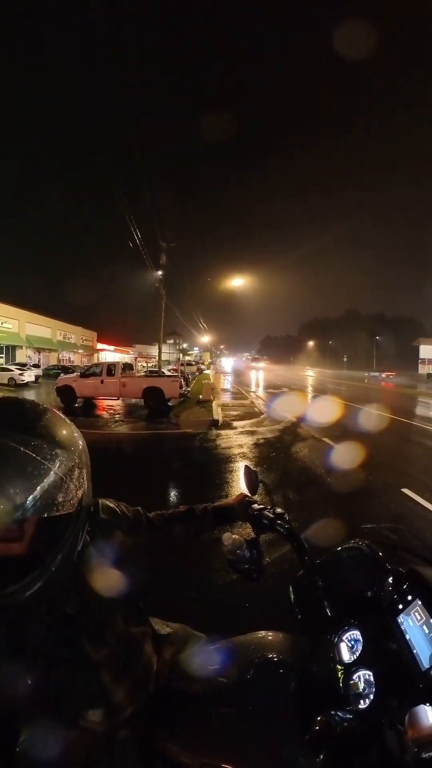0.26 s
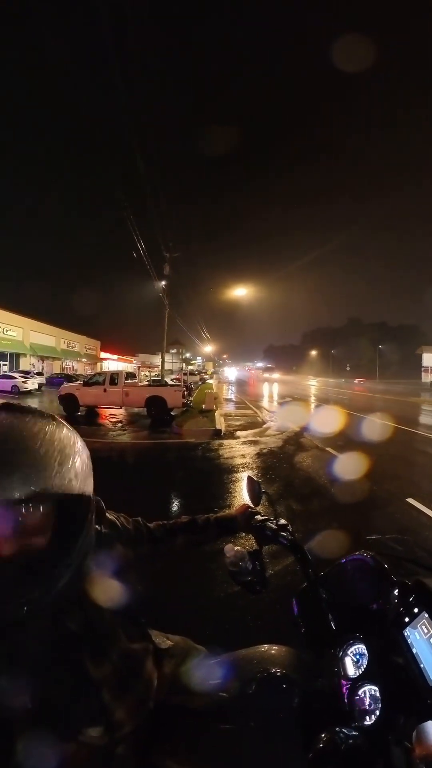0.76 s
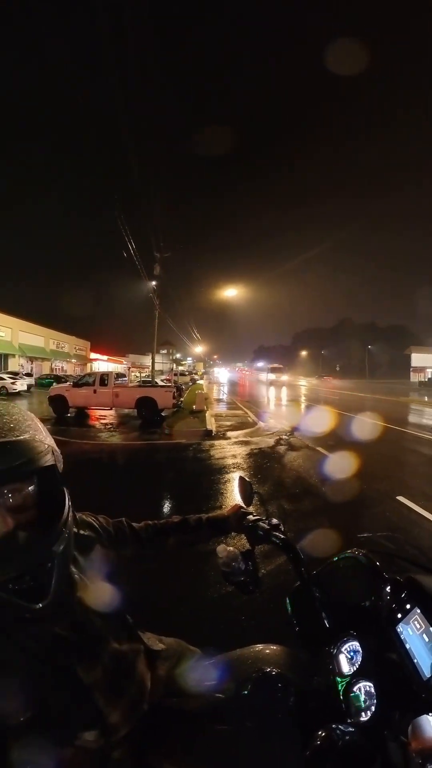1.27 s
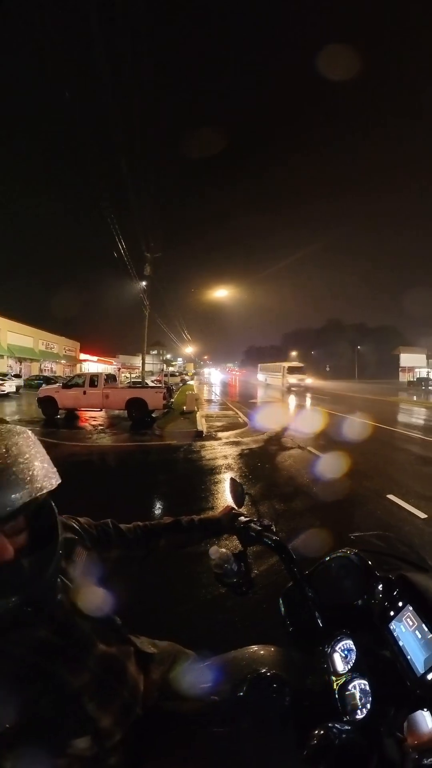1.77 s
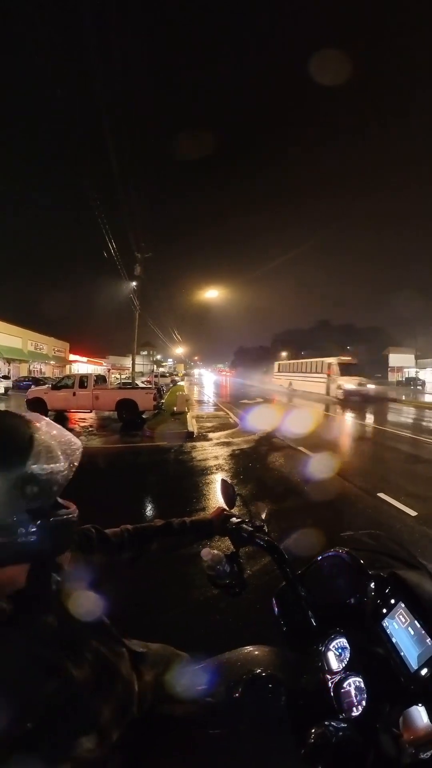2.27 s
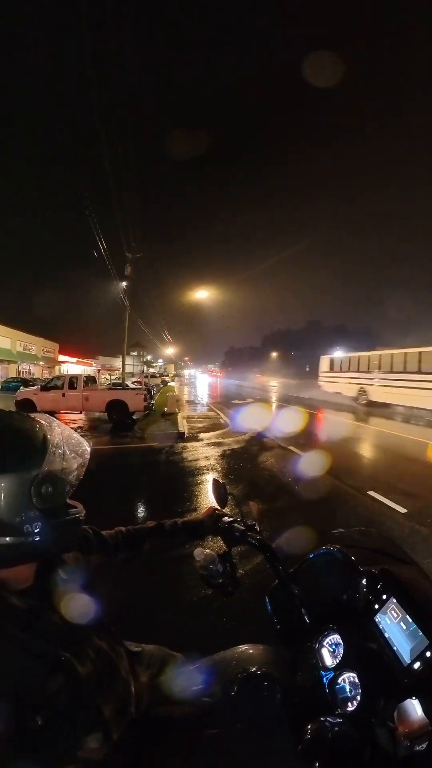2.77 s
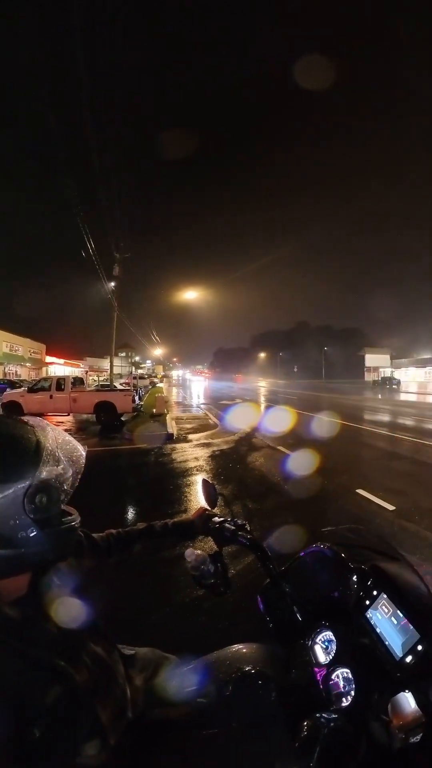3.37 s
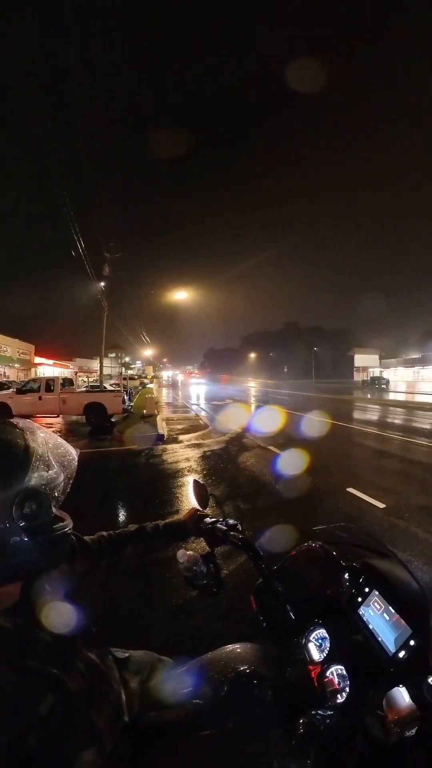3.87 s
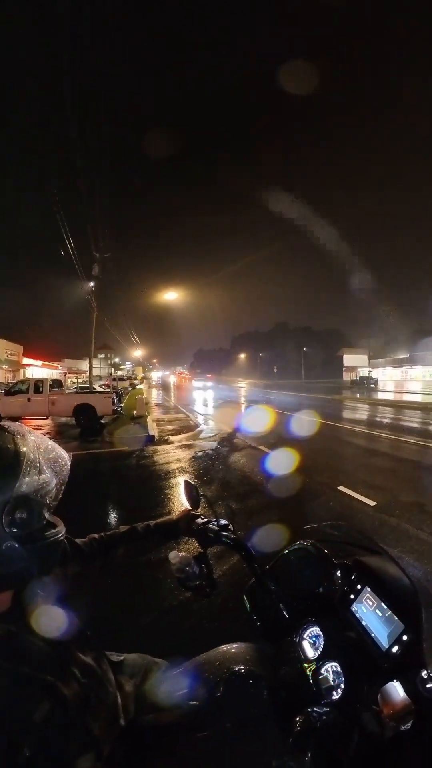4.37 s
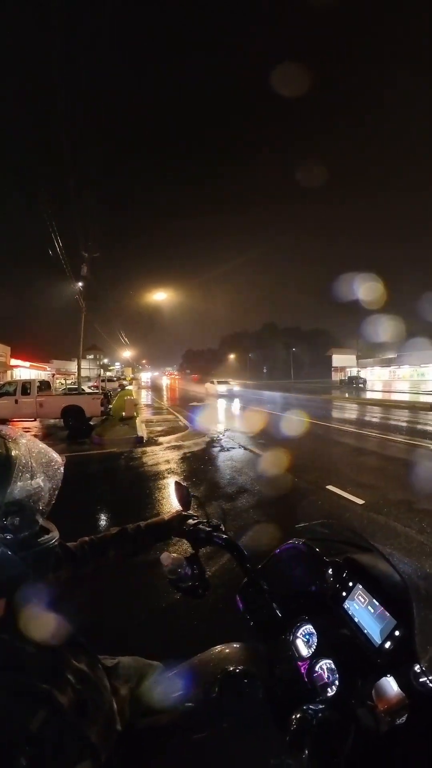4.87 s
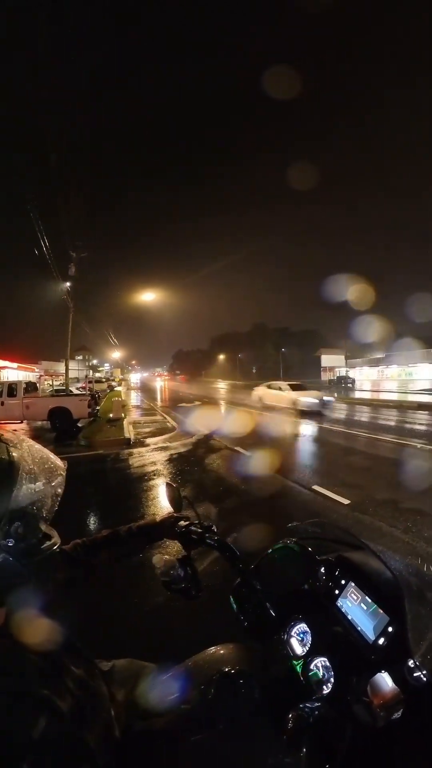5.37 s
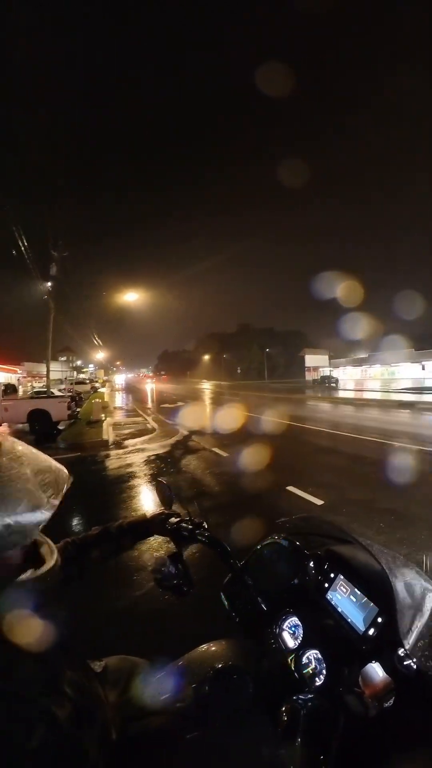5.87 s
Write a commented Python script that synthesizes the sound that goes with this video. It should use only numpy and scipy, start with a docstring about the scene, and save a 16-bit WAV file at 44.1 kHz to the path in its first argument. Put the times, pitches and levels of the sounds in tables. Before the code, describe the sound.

Two V-twin motorcycles idle with a lumpy throb and light metallic knocking beside a wet road, one right at the microphone. A bus passes, its tyres hissing and splashing through water, while a few raindrops tick close by. About halfway through, the near bike pulls away, its engine rising to a drone, dipping, then revving higher. The other keeps idling more quietly, and a car swishes by near the end.

```python
"""The lumpy idle of two V-twin motorcycles is heard first, beside a wet road at night. The near one pulls
away, revving in two swells, while its neighbour keeps idling. Each firing sends a pressure pulse
that rings the exhaust's resonances; at speed the pulses merge into a harmonic drone. A bus and two cars
pass, their tyres breaking the water film into hissing spray, and light rain ticks close by."""
import sys
import numpy as np
from scipy import signal
from scipy.fft import rfft, irfft, next_fast_len
from scipy.io import wavfile
from scipy.ndimage import map_coordinates

SR = 44100
rng = np.random.default_rng(int(sys.argv[2]) if len(sys.argv) > 2 else 0)


def wav_out(sig):
    """Save sig, one row per channel (or a flat mono array), as 16-bit PCM at SR to the path in sys.argv[1]."""
    wavfile.write(sys.argv[1], SR, np.round(np.clip(np.atleast_2d(sig).T, -1, 1) * 32767).astype(np.int16))


N = 270333
TIME = np.arange(N) / SR

# Speed of the near engine. Each row: time in seconds, four-stroke cycles per second.
SPEED = [(0, 11.41), (.75, 10.82), (1.35, 11.14), (2.1, 10.87), (2.45, 11.25), (2.83, 10.9), (3.2, 17.73),
         (3.4, 20.5), (3.87, 20.54), (4.4, 15.81), (4.77, 16.96), (5.14, 17.19), (5.29, 24.46),
         (5.58, 23.11), (5.8, 23.87), (5.9, 20.41), (6.13, 17.79)]
# How bright and hissy the near engine sounds: steady at idle, swelling and ebbing as it revs.
# Each row: time in seconds, brightness from 0 to 1.
ENGINE_BRIGHTNESS = [(2.85, 0.76), (3.1, 0.87), (3.3, 0.82), (3.9, 0.8), (4.11, 1), (4.38, 0.84),
                     (4.55, 0.88), (5.1, 0.87), (5.25, 0.95), (5.34, 0.52), (5.41, 0.81), (5.79, 0.83),
                     (5.85, 0.63)]
# Load from the slipping clutch. Each row: time in seconds, load from 0 to 1.
LOAD = [(3.18, 1), (3.42, 0), (3.9, 0.02), (4.3, 0.95), (5.15, 0.94), (5.33, 0)]
# Resonant modes. Each row: frequency in Hz, bandwidth in Hz, relative gain in dB.
EXHAUST_MODES = [(54.8, 9.5, -9), (69.4, 2.5, 0), (87.2, 5.6, -6.5), (110, 7.8, -3), (118.6, 24.7, -6.5),
                 (132, 6, -9.5), (163.4, 2.8, 0), (182.8, 6.1, 0.5), (212, 6.2, -27.5), (231, 9, -11),
                 (286, 5.4, -19), (353, 5.5, -17), (343, 36, -12)]   # near pipes and mufflers
THUMP_MODES = [(119.3, 22, -5.5)]   # the strong cylinder in the muffler at idle
BARK_MODES = [(150, 120, 41)]   # the pipe during a hard spin-up
BOOM_MODES = [(66, 36, 33), (175, 70, 37)]   # the open pipe as the engine shudders
CASING_MODES = [(924, 13, -1.5), (1189, 10, 0.5), (1473, 22, -17.5)]   # crankcase and covers
NEIGHBOUR_MODES = [(51.1, 11.5, -1), (78, 7.4, -18), (109.7, 19, -18.5), (133.8, 26, -1), (162, 22, -19),
                   (226, 67, -12), (265, 15, -26.5), (360, 21, -23.5)]
METAL_MODES = [(688, 34, 1.5), (738, 36, 5.5), (920, 110, -19), (1130, 110, -21)]   # the neighbour's ringing metal
# Exhaust harmonics. Each row: multiple of the cycle rate, relative dB running free, the same under load.
HARMONICS = [(2, -25, -56), (3, -27, -26.5), (4, -27.5, -18.5), (5, -19, -21), (6, -31, -26), (7, -23, -22),
             (8, -26.5, -46), (9, -22.5, -22.5), (10, -27, -25.5), (11, -43.5, -33.5), (12, -26.5, -38.5),
             (13, -35, -29), (14, -34, -24.5), (15, -49, -31), (16, -33.5, -72), (17, -46, -42),
             (18, -40.5, -30.5)]
# Muffler response. Each row: frequency in Hz, gain in dB.
MUFFLER_RESPONSE = [(60, -6.5), (118, 1.5), (146, 2.5), (166, -2.5), (186, -2), (212, -9), (380, -5.5),
                    (430, -23)]
# Reflections of the neighbour's exhaust. Each row: delay in seconds, gain in dB.
REFLECTIONS = [(.009, -5.5), (.019, 0.5), (.036, -4)]
# The neighbour's hardest knocks. Each row: time in seconds, relative strength in dB.
KNOCKS = [(.17, -31), (.353, -28.5), (.726, -28.5), (.945, -30), (1, -30), (1.594, -28.5), (1.835, -30.5),
          (1.967, -31), (2.02, -31.5), (2.151, -31), (2.202, -30), (2.483, -31), (2.571, -30.5),
          (2.756, -31), (4.238, -27), (4.323, -32), (4.951, -31)]
# Noise spectra of the near engine. Each row: frequency in Hz, relative spectral density in dB.
MACHINERY_SPECTRUM = [(300, 7), (420, -2), (500, -3.5), (720, -1.5), (850, -7), (1050, -9), (1200, -10.5),
                      (1430, -13.5), (1520, -20), (2400, -21.5), (4000, -38.5)]
INTAKE_SPECTRUM = [(4200, -11), (5000, -3), (6500, -5), (8000, 2), (9200, -4), (10500, -9), (12000, -13.5),
                   (15000, -25)]
TAILPIPE_SPECTRUM = [(260, 8), (380, -4.5), (500, -13)]
# Noise spectra of wet tyres. Each row: frequency in Hz, relative spectral density in dB.
ROAR_SPECTRUM = [(300, -6), (480, 11.5), (900, 12), (1600, 4), (1900, 5.5), (2300, 2), (2700, 1),
                 (3300, -8), (5000, -27)]
SPLASH_SPECTRUM = [(2400, -24), (3000, 8), (3350, 5.5), (3700, 8), (4100, 6.5), (4250, 6), (4800, 2),
                   (5600, -39)]
SPRAY_SPECTRUM = [(4200, -8), (5000, 4), (6000, 4.5), (6500, 3), (7400, 2.5), (8300, -6.5), (9500, -18),
                  (12000, -22)]
MIST_SPECTRUM = [(6000, 2), (8000, 1), (9200, -2), (10500, -7.5), (12000, -11.5), (13500, -24.5),
                 (15000, -34)]
# Stereo width of the noise. Each row: frequency in Hz, side level relative to mid in dB.
STEREO_WIDTH = [(1500, -65.5), (2300, -92), (2900, -15), (4000, -1.5), (5400, -4), (6500, -2.5),
                (8000, -13), (11000, -32.5)]
# Vehicles, the bus loudest. Each row: nearest moment in seconds, relative dB, rise and fall in seconds.
PASSES = [(1.8, -4, 0.37, 0.86), (2.75, -2, 0.51, 0.18), (5.62, -11, 0.061, 0.11)]
# The bus's axles in standing water. Each row: time in seconds, relative level in dB.
AXLES = [(2.32, -5), (2.769, -5)]
# Distant wet treads. Each row: peak time in seconds, pitch in Hz, level in dB, swell time in seconds.
SIZZLES = [(1.25, 3820, -58, 0.47), (4.8, 6520, -62.5, 0.22), (5.3, 4120, -72.5, 0.34)]
# Close raindrops. Each row: start in seconds, pitch in Hz, peak level in dB.
DROPS = [(1.029, 5740, -46), (1.152, 6000, -43), (1.48, 7500, -45), (2.251, 5670, -44), (2.394, 6580, -50),
         (2.672, 4750, -42), (3.62, 6400, -55), (4.701, 6370, -48), (5.169, 6540, -44), (5.577, 5240, -47)]

# Gains that follow the brightness. Each pair: gain in dB at brightness 0, dB added at brightness 1.
FIRING_DB, EDGE_DB, SECOND_CYLINDER_DB = (1, -1), (-11, 11), (-8.5, 5)
MACHINERY_DB, INTAKE_DB, TAILPIPE_DB = (-41.5, 6), (-89, 31), (-58, 23.5)
# Tyre noise. Each triple: base gain in dB of distant traffic, of a passing vehicle, of an axle in water.
ROAR_DB, SPLASH_DB = (-48.5, -42.5, -33.5), (-59, -54.5, -47)
SPRAY_DB, MIST_DB = (-60, -52, -59), (-65.5, -50, -71)

SECOND_FIRING = .434   # cycles after the first cylinder
STEADY_FLOW_RATE, HARD_SPIN_UP = 15.5, 65.7   # cycles per second; cycles per second gained in a second
PULL_AWAY_S, ROLL_S = 3.07, .17
CLUTCH_BITE_S, SHUDDER_WIDTH_S, SHUDDER_SCATTER_S = 4.14, .1, .003
MUFFLER_HZ, MUFFLER_WIDTH_HZ, MUFFLER_CHAMBERS = 140, 65, 3


def near_engine():
    """Periodic combustion: the firing rate sets the pitch, and the clutch's bite briefly unsettles it."""
    speed, = read(SPEED)
    cycles = np.cumsum(speed) / SR - .005
    when, second = firings(cycles)
    shudder = np.exp(-.5 * ((when - CLUTCH_BITE_S) / SHUDDER_WIDTH_S) ** 2)
    when = when + SHUDDER_SCATTER_S * shudder * rng.uniform(-.72, 1, 256)[:len(when)]
    return exhaust(when, second, shudder, cycles, speed) + machinery(when, speed) + gas_flow()


def exhaust(when, second, shudder, cycles, speed):
    """Pulse excitation of resonant pipes: separate puffs at idle give way to a drone in steady flow."""
    pace = read(SPEED, when)[0] / speed[0]
    sizes = brightness_gain(FIRING_DB, when) * brightness_gain(SECOND_CYLINDER_DB, when) ** second
    sizes = sizes * uneven(when, spread_db=.8) ** (1 / pace)   # combustion evens out with speed
    pulses = valve(when, sizes, speed)
    # the deep thud fades as the firings crowd together, and gains up to 1 dB in the shudder
    thud = cut(valve(when, sizes / pace ** 2 * from_db(shudder), speed), 89.7, "low")
    soft = thud + cut(cut(pulses, 116, "low") - thud, 52.7, "high", order=4)
    sharp = cut(valve(when, sizes * brightness_gain(EDGE_DB, when), speed), 460, "low")
    eddies = from_db(-52) * bursts(pulses, decay_s=.02) * cut(rng.standard_normal(N), 250, "low")
    spin_up = np.clip(np.interp(when, TIME, np.gradient(speed) * SR) / HARD_SPIN_UP, 0, 1)
    # a shudder or a hard spin-up half breaks up the steady flow
    steadiness = np.interp(TIME, when, (1 - .5 * shudder) * (1 - .5 * spin_up ** 2))
    flow = np.interp(speed, [speed[0], STEADY_FLOW_RATE], [0, 1]) * steadiness
    pipes = resonate((1 - .5 * flow) * eddies + (1 - flow) * (soft + sharp), EXHAUST_MODES)
    thump = resonate(cut(valve(when, sizes * (1 - second) / pace ** 4, speed), 128, "low"), THUMP_MODES)
    puffs = from_db(41.5) * cut(pipes + (1 - flow) * thump, 420, "low", order=8)
    bark = resonate(cut(valve(when, -sizes * spin_up ** 2, speed), 210, "low"), BARK_MODES)
    boom = resonate(cut(valve(when, sizes * shudder, speed), 100, "low"), BOOM_MODES)
    return puffs + flow * drone(cycles, speed) + bark + boom


def firings(cycles):
    """A V-twin fires at unequal intervals; gives each firing's time and cylinder (0 or 1)."""
    count = np.arange(-2, 200)
    second = count % 2
    angle = count // 2 + second * SECOND_FIRING
    heard = (angle >= cycles[0]) & (angle < cycles[-1])
    return np.interp(angle[heard], cycles, TIME), second[heard]


def valve(when, sizes, speed, top_harmonic=15.4, half_length_cycles=.082):
    """Time scaling: the valve opens for a fixed crank angle, so faster puffs are shorter and brighter."""
    nearest = np.searchsorted((when[1:] + when[:-1]) / 2, TIME)
    angle = (TIME - when[nearest]) * speed
    puff = np.sinc(2 * top_harmonic * angle) * np.exp(-(angle / half_length_cycles) ** 2)
    return sizes[nearest] * puff * 2 * top_harmonic * speed / SR


def drone(cycles, speed):
    """Harmonic series: load and brightness shift its balance; the muffler colours and delays it."""
    load = np.clip(read(LOAD)[0], 0, 1)
    growl_db = 49 * (read(ENGINE_BRIGHTNESS)[0] - .78)   # neutral at a brightness of .78
    second_gain = from_db(sum(SECOND_CYLINDER_DB))
    out = 0
    for k, free_db, loaded_db in HARMONICS:
        hz = k * speed
        growl_share = np.interp(k, [28, 12.5], [0, 1])
        db = free_db + load * (loaded_db - free_db) + growl_db * growl_share
        gain = from_db(db + read(MUFFLER_RESPONSE, hz)[0])
        twin_phase = np.angle(1 + second_gain * np.exp(-2j * np.pi * k * SECOND_FIRING))
        lag = MUFFLER_CHAMBERS * np.arctan(2 * (hz - MUFFLER_HZ) / MUFFLER_WIDTH_HZ)
        out = out + gain * np.cos(2 * np.pi * k * cycles + twin_phase - lag)
    return out * flutter(rate_hz=25, depth_db=.4)


def machinery(when, speed, db_per_octave=-1.5):
    """Amplitude modulation: chain, gears and casing throb at each firing; the casing grows with speed."""
    kicks = clicks(when, read(ENGINE_BRIGHTNESS, when)[0] ** 2)
    throb = rms_one(1 + 1.3 * cut(bursts(kicks, decay_s=.005), 700, "low"))
    churn = brightness_gain(MACHINERY_DB) * from_db(db_per_octave * np.log2(speed / speed[0]))
    gears = churn * flutter(rate_hz=30, depth_db=1.43) * hiss(MACHINERY_SPECTRUM)
    ringing = rms_one(resonate(rng.standard_normal(N), CASING_MODES))
    casing = from_db(-50.5) * (speed / speed.max()) ** 3 * ringing
    return throb * (gears + casing)


def gas_flow():
    """Flow noise: the intake hisses and the tailpipe rushes, swelling and ebbing as the engine revs."""
    intake = patchy(hiss(INTAKE_SPECTRUM), depth_db=3.5, rate_hz=55, width_hz=310)
    return brightness_gain(INTAKE_DB) * intake + brightness_gain(TAILPIPE_DB) * hiss(TAILPIPE_SPECTRUM)


def neighbour_engine(cycles_per_s=10.83):
    """Beating: a second pulse train idles near the first one's rate, and is quieter once left behind."""
    when, second = firings(TIME * cycles_per_s - .87)
    when = when + .00109 * rng.standard_normal(256)[:len(when)]
    pulses = clicks(when, from_db(-2.5 * second) * uneven(when, spread_db=2.2))
    pipes = from_db(33.5) * echoes(cut(resonate(pulses, NEIGHBOUR_MODES), 217, "low", order=4))
    behind = np.clip((TIME - PULL_AWAY_S) / ROLL_S, 0, 1)
    return from_db(-6.5 * behind) * pipes + from_db(-2 * behind) * metal_knocks(when, second)


def metal_knocks(when, second):
    """Impact excitation: at each firing a hard contact and a short rattle ring the metal's modes."""
    hard_s, hard_db = np.transpose(KNOCKS)
    is_light = np.abs(when[:, None] - hard_s).min(axis=1) > .015
    light_sizes = is_light * from_db(-37.5 - 1.5 * second) * uneven(when, spread_db=1.5)
    kicks = clicks(when, light_sizes) + clicks(hard_s, from_db(hard_db))
    rattle = from_db(13) * bursts(kicks, decay_s=.0021) * rng.standard_normal(N)
    ringing = resonate(from_db(37) * kicks + rattle, METAL_MODES)
    return cut(cut(ringing, 370, "high"), 2100, "low")


def echoes(x):
    """Reflection: ground, parked cars and shop fronts return delayed copies."""
    return x + sum(from_db(db) * np.interp(TIME - s, TIME, x, left=0) for s, db in REFLECTIONS)


def wet_road(thinning_db_per_s=-1.6):
    """Broadband tyre noise: treads roar, splash through the water film and throw up spray and mist."""
    roar_gain = tyre_gain(ROAR_DB) * from_db(thinning_db_per_s * TIME)
    roar = roar_gain * hiss(ROAR_SPECTRUM) * flutter(rate_hz=42, depth_db=.24)
    splash = tyre_gain(SPLASH_DB) * hiss(SPLASH_SPECTRUM)
    spray = tyre_gain(SPRAY_DB) * hiss(SPRAY_SPECTRUM) * flutter(rate_hz=30, depth_db=1.95)
    mist = tyre_gain(MIST_DB, lead_s=.16) * hiss(MIST_SPECTRUM)   # thrown ahead of the vehicle
    # countless droplets make each band swell and fade
    return patchy(roar + splash + spray + mist, depth_db=4, rate_hz=55, width_hz=446)


def tyre_gain(levels, lead_s=0):
    """Incoherent sources add in power: distant traffic, passing vehicles and the bus's axles."""
    distant_db, vehicle_db, axle_db = levels
    vehicles = [from_db(vehicle_db + db) * swell(s - lead_s, rise_s, fall_s + lead_s)
                for s, db, rise_s, fall_s in PASSES]
    axles = [from_db(axle_db + db) * swell(s, rise_s=.066, fall_s=.032) for s, db in AXLES]
    return np.sqrt(from_db(distant_db) ** 2 + sum(gain ** 2 for gain in vehicles + axles))


def sizzle(width_hz=400):
    """Narrow-band noise has a pitch: wet treads sizzle while a vehicle is still far off."""
    out = 0
    for s, hz, db, swell_s in SIZZLES:
        gain = from_db(db) * swell(s, swell_s, swell_s) * flutter(rate_hz=14, depth_db=4.5)
        out = out + gain * rms_one(resonate(rng.standard_normal(N), [(hz, width_hz, 0)]))
    return out


def near_drops(rise_s=.0012):
    """Damped oscillation: each close drop rings for a few milliseconds."""
    out = 0
    for s, hz, db in DROPS:
        age = np.clip((TIME - s) / rise_s, 0, 20)
        out = out + from_db(db) * age * np.exp(1 - age) * np.sin(2 * np.pi * hz * TIME)
    return out


def rain(per_pitch_per_s, level_db, q):
    """A Poisson process: small drops tick at random on bike and road, at twelve pitches."""
    out = 0
    for hz in np.geomspace(2500, 9000, 12):
        chance, size = rng.random((2, N))
        impacts = (chance < per_pitch_per_s / SR) * from_db(-18 * size)
        out = out + resonate(impacts, [(hz, hz / q, 0)])
    return from_db(level_db) * rms_one(cut(out, 8000, "low", order=6))


def resonate(x, modes):
    """Modal superposition: damped resonators in parallel, each with its own peak gain."""
    out = 0
    for hz, width, db in modes:
        r = np.exp(-np.pi * abs(width) / SR)
        feedback = [1, -2 * r * np.cos(2 * np.pi * hz / SR), r * r]
        out = out + from_db(db) * (1 - r * r) / 2 * signal.lfilter([1, 0, -1], feedback, x + 1e-18)
    return out


def hiss(spectrum, skirt_db_per_neper=13):
    """Spectral shaping: stereo noise, mono in the bass and wide in the low treble; the mid has rms 1."""
    size = next_fast_len(N)
    log_hz = np.log(np.fft.rfftfreq(size, 1 / SR) + 1)
    along = lambda rows: np.interp(log_hz, np.log([p[0] for p in rows]), [p[1] for p in rows])
    beyond = np.abs(log_hz - np.clip(log_hz, np.log(spectrum[0][0]), np.log(spectrum[-1][0])))
    shape = from_db(along(spectrum) - skirt_db_per_neper * beyond)
    mid, side = rfft(rng.standard_normal((2, size))) * shape
    mid = irfft(mid, size)[:N]
    side = irfft(side * from_db(along(STEREO_WIDTH)), size)[:N]
    return np.array([mid + side, mid - side]) / mid.std()


def patchy(x, depth_db, rate_hz, width_hz):
    """Independent modulation: each narrow band swells and fades on its own."""
    hz, s, bands = signal.stft(x, SR, nperseg=256)
    grid = np.meshgrid(hz / width_hz, s * rate_hz, indexing="ij")
    patches = map_coordinates(rng.standard_normal((128, 1024)), grid, order=1, mode="mirror")
    return signal.istft(bands * from_db(depth_db * patches), SR)[1][..., :N]


def flutter(rate_hz, depth_db):
    """Random modulation: a gain that wanders."""
    knots = rng.standard_normal(1024)
    return from_db(depth_db * np.interp(TIME * rate_hz, np.arange(len(knots)), knots))


def uneven(when, spread_db):
    """Cyclic variation: no two combustions are equally strong."""
    return from_db(spread_db * np.clip(rng.standard_normal(256)[:len(when)], -2, 2))


def brightness_gain(law, when=TIME):
    """A gain whose level in dB is linear in the engine's brightness."""
    base_db, added_db = law
    return from_db(base_db + added_db * read(ENGINE_BRIGHTNESS, when)[0])


def swell(at_s, rise_s, fall_s):
    """A Gaussian envelope with its own rise and fall."""
    return np.exp(-.5 * ((TIME - at_s) / np.where(TIME < at_s, rise_s, fall_s)) ** 2)


def bursts(kicks, decay_s):
    """Exponential decay: an envelope that jumps at each kick and dies away."""
    return signal.lfilter([1], [1, -np.exp(-1 / (decay_s * SR))], kicks + 1e-18)


def clicks(when, sizes):
    """An impulse train with the given times and sizes."""
    return np.bincount(np.clip(np.round(when * SR).astype(int), 0, N), sizes, N + 1)[:N]


def cut(x, hz, kind, order=2):
    """Butterworth low- or high-pass filtering."""
    return signal.sosfilt(signal.butter(order, hz, kind, fs=SR, output="sos"), x + 1e-18)


def read(rows, at=TIME):
    """Linear interpolation of a table along its first column."""
    axis, *columns = np.transpose(rows)
    return [np.interp(at, axis, column) for column in columns]


def from_db(db):
    """Decibels to amplitude ratio."""
    return 10 ** (np.asarray(db) / 20)


def rms_one(x):
    """Normalisation to unit rms."""
    return x / np.sqrt(np.mean(x ** 2) + 1e-20)


def scene():
    """Superposition: the pressures of engines, wet traffic and rain add."""
    vehicles = near_engine() + neighbour_engine() + wet_road() + sizzle()
    return vehicles + near_drops() + rain(per_pitch_per_s=8.3, level_db=-69, q=71)


def record(dry):
    """Band limiting: the microphone drops the deep bass and the highest treble."""
    low_pass = signal.cheby2(12, 70, 15794, fs=SR, output="sos")
    return signal.sosfilt(low_pass, cut(dry, 42, "high", order=6))


dry = scene()
out = record(dry)
wav_out(out)
```